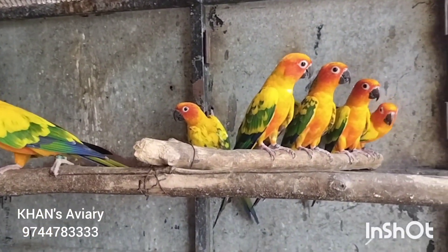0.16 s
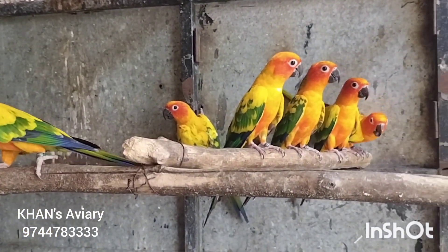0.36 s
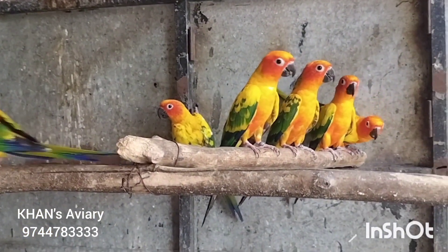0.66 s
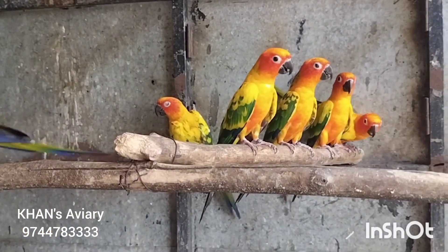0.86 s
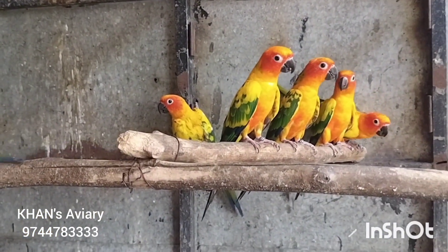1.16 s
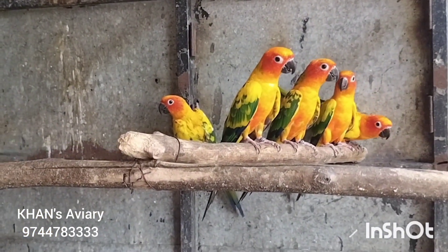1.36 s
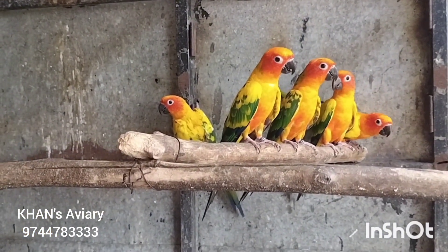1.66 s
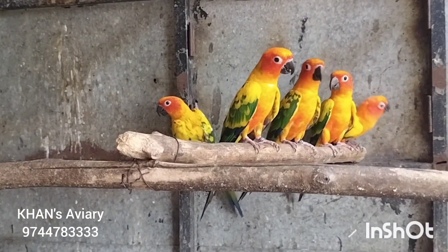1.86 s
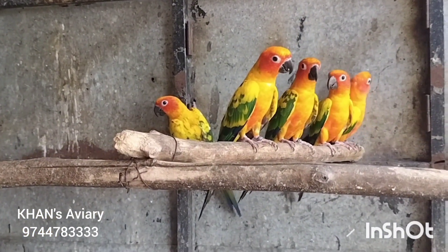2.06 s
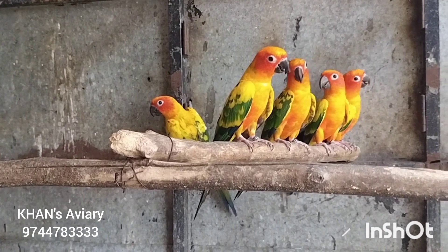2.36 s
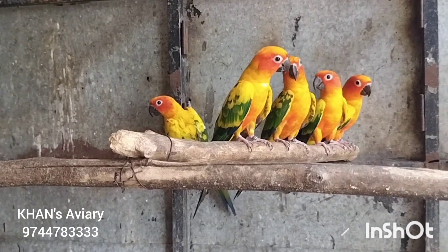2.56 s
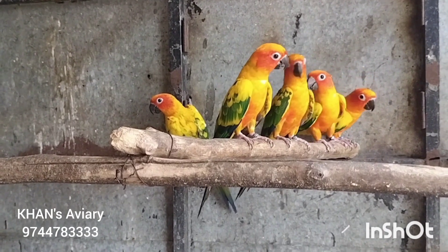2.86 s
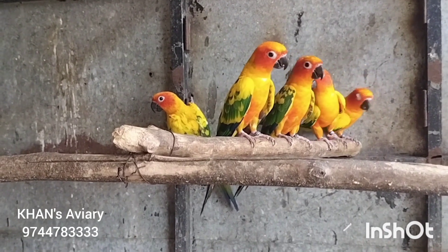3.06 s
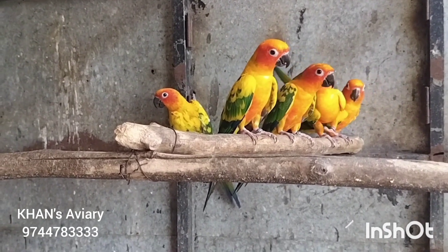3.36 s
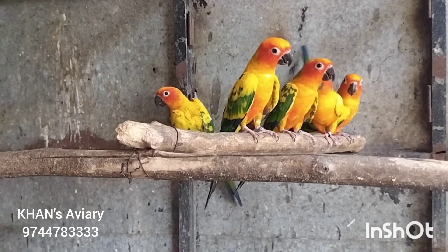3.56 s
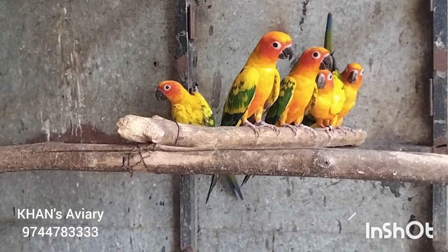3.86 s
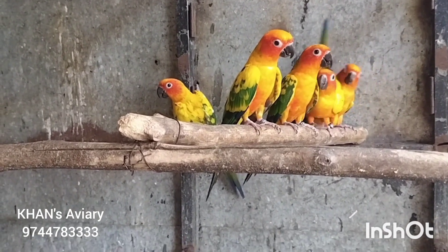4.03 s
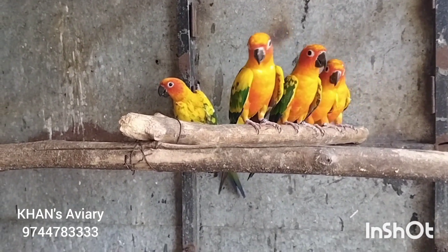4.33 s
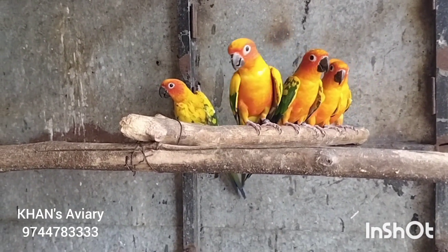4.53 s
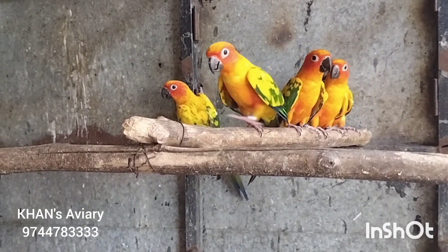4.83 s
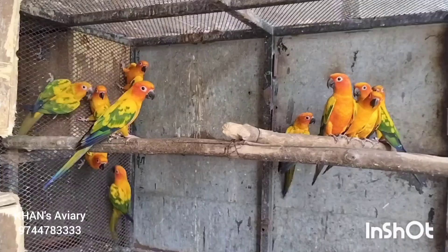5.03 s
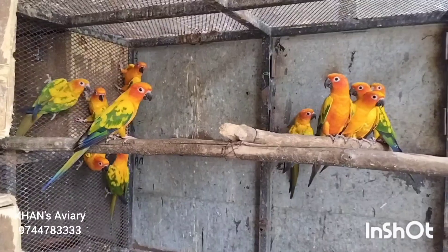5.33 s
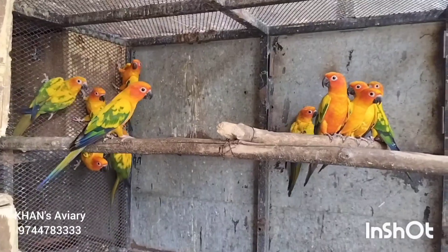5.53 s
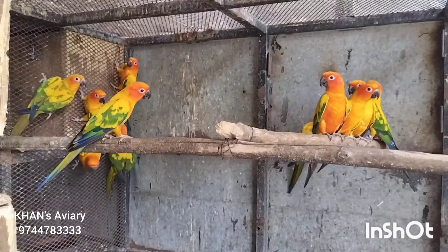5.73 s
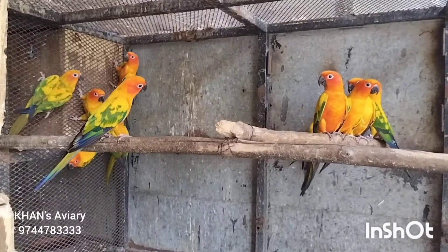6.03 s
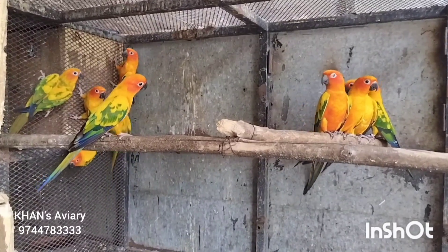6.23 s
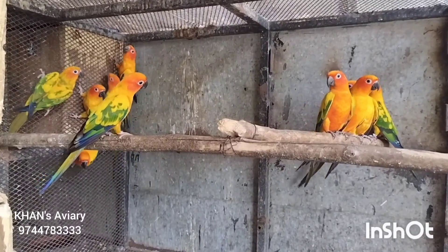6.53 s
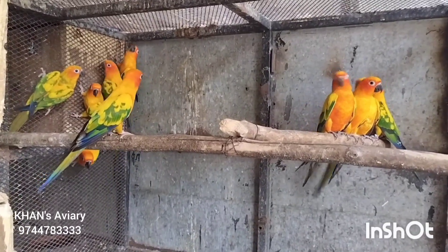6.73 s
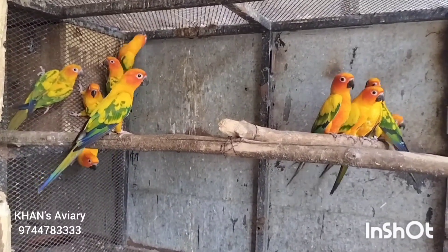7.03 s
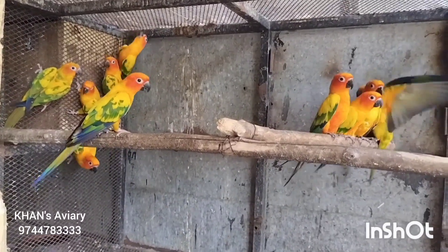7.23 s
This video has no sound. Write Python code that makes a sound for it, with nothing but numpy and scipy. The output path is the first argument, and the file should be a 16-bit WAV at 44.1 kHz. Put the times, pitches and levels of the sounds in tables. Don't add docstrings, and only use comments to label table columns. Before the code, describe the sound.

Small parrots screech and rattle harshly in a hard-walled aviary over faint traffic rumble, with a silent gap before louder chattering squawks.

```python
import sys
import numpy as np
from scipy import signal
from scipy.fft import rfft, irfft, next_fast_len
from scipy.io import wavfile
from scipy.ndimage import uniform_filter1d, minimum_filter1d, map_coordinates

SR = 44100
rng = np.random.default_rng(int(sys.argv[2]) if len(sys.argv) > 2 else 0)


def persist_wave(psi):
    counts = np.round(np.clip(psi, -1, 1) * 32767).astype(np.int16)
    wavfile.write(sys.argv[1], SR, np.atleast_2d(counts).T)


def rack_gain(trim_db):
    fader = np.asarray(trim_db, float)
    return 10 ** (fader / 20)


N = 325899

# first scene's end, second's stuttering start, its steady start, in seconds.
SCENE_CHANGE_S = (4.96, 5.6295, 5.66)

# time in seconds, level in dB.
TRAFFIC_DB = [(0, -40.5), (.23, -46.5), (1.73, -46.5), (1.8, -50), (2.38, -47), (3.94, -47), (4.1, -42),
              (4.46, -45.5), (4.58, -46.5), (4.96, -45), (5.66, -46), (5.88, -38), (6.38, -46),
              (6.45, -39.5), (7.39, -45.5)]
# frequency in Hz, level in dB.
RUMBLE_SPECTRUM = [(12, -52), (20, -6), (81, -1), (97, -3.5), (118, 1.5), (151, 1), (200, -0.5),
                   (258, -7.5), (500, -15), (650, -59), (1100, -120)]
# frequency in Hz, level in dB.
HISS_SPECTRUM = [(180, -12), (300, -27.5), (477, -20), (535, -9), (642, 8), (1540, -3), (1700, 0),
                 (3240, -5.5), (4150, -2), (15600, -21.5)]
HISS_DB, HISS_TRAFFIC_SHARE, SECOND_HISS_DB = -56.5, 0.82, 4
CALMER_DB, CALMER_HZ = -4.5, 107
# start in seconds, end in seconds, frequency in Hz, level in dB.
MOTOR_HUM = [
    (0, 1.75, 91.5, -54),
    (2.27, 4.2, 91.5, -54),
    (0, 4.2, 150.7, -57),
    (6.45, 7.2, 156.1, -50),
]
# frequency in Hz, likeness 0-1.
PORT_LIKENESS = [(60, 0.81), (240, 0.98), (950, 0.24), (3770, 0.25), (15000, 0.3)]
# frequency in Hz, left-right difference in dB.
PORT_BALANCE = [(60, 0), (110, -0.5), (200, -0.5), (380, 0.5), (700, -3), (1290, 3), (2380, 5), (4400, 11),
                (8120, 4.5), (15000, -13)]
# frequency in Hz, 60 dB decay time in seconds.
WALL_T60 = [(500, 0.48), (2000, 0.51), (5000, 0.4), (9000, 0.32), (14000, 0.33)]

# strongest swish in seconds, level in dB, rise in dB/s, fall in dB/s.
WING_SWISHES = [
    (4.01, -46, 275, 82),
    (4.43, -48.5, 903.5, 253),
    (4.62, -57.5, 45, 613),
    (7.113, -39.5, 349, 99.5),
    (7.39, -43.5, 423, 100),
]
# frequency in Hz, level in dB.
FEATHER_SPECTRUM = [(88, -28), (150, -3.5), (542, -26.5), (643, -13.5), (922, -29), (1930, -27),
                    (9000, -59), (11700, -68), (19800, -120)]
# start in seconds, length in seconds, first pitch in Hz, last pitch in Hz, level in dB.
DOVE_COO = (2.53, .135, 640, 760, -55)
# time in seconds, peak in dB.
CLAW_TICKS = [
    (2.145, -47),
    (3.84, -45.5),
    (3.9663, -47.5),
    (4.35, -62),
    (7.169, -49.5),
]

# frequency in Hz, level in dB.
THROAT_DB = [(290, -71), (500, -87.5), (955, -13), (1650, -9), (2020, -2.5), (3540, -3.5), (4150, -3),
             (4860, -5), (6030, -9), (8760, -22), (9830, -21), (12400, -36.5), (13900, -42), (15600, -50)]
BOOST_WIDTH = .75

# time in seconds, peak in dB.
FIRST_SQUAWKS = [
    [(1.8367, -13), (1.8614, -17), (1.8811, -14), (1.9031, -12), (1.9244, -12), (1.9414, -13),
     (1.9575, -17)],
    [(3.1084, -8), (3.1283, -10), (3.1482, -8), (3.1692, -8), (3.1951, -9), (3.2184, -13)],
    [(4.7636, -23), (4.779, -18), (4.7934, -20), (4.8054, -21), (4.8174, -23), (4.8284, -25), (4.8414, -26),
     (4.8564, -24), (4.8753, -18), (4.8963, -19), (4.9195, -21)],
]
# time in seconds, peak in dB.
SECOND_SQUAWKS = [
    [(6.4158, -9), (6.4298, -6), (6.4512, -6), (6.4732, -7), (6.4946, -6), (6.5166, -8), (6.538, -7),
     (6.5584, -9), (6.5859, -5), (6.6024, -10)],
    [(6.754, -6), (6.7695, -7), (6.7915, -6), (6.8144, -8), (6.8394, -8), (6.8613, -11), (6.886, -12),
     (6.909, -12)],
]
# pitch in Hz, harshness 0-1.
RATTLE_VOICE = [
    (780, .25),
    (880, .5),
    (850, .5),
    (900, .55),
    (840, .36),
]
# squawk length in seconds, room in dB, left-right in dB, left lead in ms.
RATTLE_PLACES = [
    (.021, -6, 3.5, .35),
    (.018, -5, 5, .3),
    (.012, -7, 2.5, -.05),
    (.018, -6.5, 3, .15),
    (.017, -7.5, 3, .15),
]
# lowest tone in dB, favoured overtone, its boost in dB, brightness in dB/octave,
# even overtones in dB (a closed windpipe weakens them).
RATTLE_BEAK = [
    (5.5, 5.7, 1.5, -1.5, 4),
    (8.5, 5.7, 3.3, 3, 1),
    (10, 1.52, 14, -4.5, 2.5),
    (-1.5, 5.3, 1.4, -0.5, -1.5),
    (5, 4.7, 5.5, -3, -3),
]
# pitch drift first to last as a share, clear chirp in dB, dulling in dB/octave.
RATTLE_CHANGE = [
    (0.0093, -28.5, 0),
    (-0.015, -20.5, 4.5),
    (0.0099, -28, 10),
    (-0.11, -21.5, 1.5),
    (-.02, -20, 6.5),
]
# first pitch in Hz, last pitch in Hz.
CHIRP_SWEEP_HZ = (870, 1200)
# frequency in Hz, level in dB.
GAPE_DB = [(700, -2.5), (1000, 1.5), (1650, -6.5), (2500, 6), (2800, 2.5), (3100, 1.5), (3550, -6),
           (4400, 6.5), (5600, -3.5), (7000, 4.5)]
GAPE_FROM_S = 4
PITCH_SCATTER = .045
SQUAWK_LEAD_S = .004

# start in seconds, length in seconds, top pitch in Hz, top level in dB,
# share of the length at which effort peaks.
CRY_EVENTS = [(0.023, 0.066, 1525, -17.5, 0.23), (0.211, 0.13, 1346, -20.5, 0.59),
              (0.312, 0.067, 2094, -9, 0.54), (0.698, 0.18, 895, -31, 0.64),
              (0.976, 0.12, 2261, -28.5, 0.75), (1.048, 0.081, 1683, -19.5, 0.96),
              (1.211, 0.024, 1486, -19, 0.13), (1.238, 0.076, 1999, -18, 0.63),
              (1.533, 0.19, 1041, -16, 0.59), (2.23, 0.23, 1186, -37, 0.6), (2.545, 0.12, 2015, -36, 0.28),
              (2.646, 0.089, 1550, -35.5, 0.92), (2.728, 0.095, 2179, -26.5, 0.42),
              (2.966, 0.15, 1993, -19, 0.38), (3.437, 0.054, 1219, -21, 0.53),
              (3.498, 0.05, 1773, -13.5, 0.17), (3.578, 0.14, 1186, -29, 0.21),
              (4.66, 0.16, 1052, -49, 0.52), (5.641, 0.12, 1788, -29, 0.081),
              (5.755, 0.2, 907, -19.5, 0.54), (6.069, 0.18, 1454, -26.5, 0.2),
              (6.293, 0.094, 1353, -32.5, 0.55), (6.878, 0.053, 2284, -16.5, 0.97),
              (6.914, 0.028, 2062, -19, 0.83), (0.367, 0.04, 1989, -14.5, 0.12),
              (1.146, 0.039, 1663, -21, 0.39), (1.31, .018, 1394, -21, 0.33),
              (1.548, 0.19, 1452, -25.5, 0.45), (2.814, 0.1, 1940, -24, 0.57),
              (3.394, 0.04, 1158, -34, 0.81), (3.43, 0.008, 1700, -21.5, 0.25),
              (0.182, 0.038, 896, -27, .6), (0, 0.023, 1330, -17, 0.13), (3.512, 0.045, 1930, -15.5, .4),
              (0.979, 0.098, 819.6, -34, 0.33), (1.713, 0.032, 1420, -20.5, 0.67),
              (5.781, .052, 2890, -31, .9)]
# swell before the top in dB, fade after it in dB.
CRY_EFFORT_DB = [(-14.5, 8.5), (0.5, -3.5), (6, 11), (15.5, 25), (2.5, -9.5), (12, 3.5), (0, -2), (5.5, -2),
                 (18.5, 2.5), (9.5, 9.5), (6, 4), (-1, 2.5), (4, 0), (10.5, 12), (-3.5, 5.5), (3, 7.5),
                 (-5.5, 21), (3.5, -5), (-22.5, 25), (17.5, 15), (-5.5, 2), (8.5, 7), (8, 4.5), (1, 10.5),
                 (1, 6.5), (6, 11.5), (-0.5, 4.5), (0.5, 8.5), (-1.5, 3.5), (2, 2), (2, 6.5), (0, 2),
                 (-31.5, 1.5), (3.5, 9), (-2, 6), (11.5, 4.5), (2.5, 1.5)]
CRY_BENDS = [(0, .02), (.15, 0), (.08, .02), (.25, .04), (.05, -.02), (.26, .03), (0, 0), (.12, .11),
             (.07, .14), (.2, .1), (.01, .04), (.19, 0), (.07, .09), (.03, .05), (.06, .08), (.02, 0),
             (.04, .03), (-.02, .06), (0, -.02), (.22, .07), (-.04, .04), (-.03, .015), (.02, 0), (0, -.02),
             (0, .2), (.02, .16), (0, .2), (.38, .09), (-.02, .05), (.1, 0), (0, 0), (.05, 0), (0, 0),
             (.05, .09), (.05, -.1), (-.04, .02), (.25, 0)]
CRY_HARSHNESS = [.4, .64, .2, .46, .5, .45, .4, .18, .3, .5, .5, .35, .27, .25, .68, .2, .75, .7, .45, .45,
                 .29, .55, .17, .15, .68, .5, .85, .72, .34, .7, .25, .35, .75, .27, .75, .25, .4]
# flutter in beats/s, room in dB, left-right in dB, left lead in ms.
CRY_PLACES = [(73.7, -10, 2.5, -0.134), (75.7, 3, 2, 0.25), (69.1, -14, -1.5, -0.05), (67.7, 11, -2, -0.23),
              (102.2, -4, 2.5, 0.38), (86.1, -1.5, 1, 0.18), (70, -1.5, 1, 0.033),
              (105.3, -7.5, -0.5, 0.303), (78.5, -9.5, 2.5, 0.313), (78.6, 0, -2.5, 0.373),
              (61.7, -9, 2, 0.3), (66.2, 4, -3, 1), (105.5, 6.5, -4.5, 1), (114.6, -1, -3, 0.412),
              (96.3, -2, 2, .3), (64.7, -19, 4, 0.422), (85, 2, -1.5, 0.39), (65.5, 7, -3.5, 0.145),
              (69, 9.5, 2.5, -0.099), (54.1, 5.5, 1, 0.3), (68.6, 9, 2.5, 0.175), (72, -4.5, -1.5, -0.36),
              (62.5, 7, 0.5, 0.19), (70.7, 1, 0, .15), (79.5, -14, -2, 0.167), (90, -4.5, 0.5, 0.16),
              (60.3, -7.5, -1, .3), (90, -1, -2.5, 0.244), (100.8, 3, -1, .35), (91, 3.5, 2, .3),
              (80, -13, 5, 0.91), (79.3, 5, -0.5, .15), (76, -10.5, 4.5, -0.055), (59.4, -15, 5, 0.38),
              (91, -1.5, -0.5, 0.025), (79.9, -12, 2.5, 0.24), (55, -2.5, 4, .3)]
# lowest tone in dB, favoured overtone, its boost in dB, brightness in dB/octave,
# perhaps even overtones in dB.
CRY_BEAKS = [(-8, 3, 3, 1), (-6.5, 5.5, 4.5, 2.5), (-3, 2, 6.5, 6), (6.5, 3, 10.5, 5, 5), (-4, 2, 8, 1.5),
             (-6, 2, 2, -1), (-0.5, 2.9, 11, 4), (-5.5, 5.2, 4.5, -0.5), (-30, 3.5, 3, 9), (7.5, 3, 6, 3.2),
             (3, 0.94, 11.5, 0), (-1.5, 2, 6, 2), (-5.5, 3.9, 7.5, 3.5), (4, 2.5, 20, 8.5),
             (-3, 4.2, 8.5, 2.5), (-7.5, 3.5, 11, 1.5), (1, 3, 5.5, 1.5), (8.5, 2, 4, -3.5),
             (-1, 4.5, 15, -3), (-7.5, 6, 2.5, 5.5, 4), (-23.5, 4, 3, 2.5), (-5, 1.5, 8.5, -0.5),
             (-5.5, 2.4, 8.5, 4), (-14.5, 10, 1.5, -0.5), (-20.5, 3.6, -9, -9), (-2.5, 3, 3.5, 0),
             (-1.5, 2.3, 10.5, 7.5), (-0.5, 3.3, 3.5, 2.5), (-0.5, 2.5, 9, 7.5), (0.5, 3, -4.5, 0),
             (-8, 7.9, 7.5, 4.5), (13.5, 3.3, 9.5, -2.5), (-7, 2.2, 6.5, 12), (-10, 1.6, 9.5, 7.5),
             (17, 2.3, 7.5, -5.5), (-10.5, 1, 11, 4), (4, 5, 0, -3)]
OWN_OVERTONES_DB = {2: [-3, 0, 4, 9, 9], 3: [-8, -14, 3, 1, -2, 5, 0, 9, 2], 8: [-20, -9, 2, 3, -3, 6, 6, 1,
                    8, 3, 11, 5, 17, 9, 0]}
FLUTTER_DEPTH_DB = [5, 3.9, 7, 3.3, 3, 2.3, 6.2, 2.4, 3.7, 3, 1.5, 3.9, 7.5, 3.7, 3, 4, 2.7, 3, 2.8, 3.6,
                    3.2, 3.1, 3.5, 2.4, 2, 3, 1.1, 2, 3, 3.5, 1, 2.5, 3, 3.5, 2.1, 3, 4]
FLUTTER_SLIDES = [.035, .035, .06, .025, .02, .04, .03, .03, .04, .04, .01, .025, .05, .03, .03, .025, .03,
                  .02, .02, .05, .02, .02, .025, .015, .04, .05, .01, .02, .04, .025, .01, .02, .02, .04,
                  .015, .02, .06]


def unit(x):
    return x / np.sqrt(np.mean(x ** 2) + 1e-20)


def along(points, hz):
    f, v = np.transpose(points)
    return np.interp(np.log(hz + 1), np.log(f + 1), v)


def wobble(rate_hz, count, order=3):
    knots = rng.standard_normal(count // 32 + 8)
    return map_coordinates(knots, [np.arange(count) * min(rate_hz / SR, 1 / 32)], order=order)


def filtered(x, response):
    m = next_fast_len(x.shape[-1] + 4096)
    return irfft(rfft(x, m) * response(np.fft.rfftfreq(m, 1 / SR)), m)[..., :x.shape[-1]]


def panned(voice, left_right_db):
    return voice * rack_gain([[left_right_db / 2], [-left_right_db / 2]])


def rush(spectrum, patchy_db):
    z = signal.stft(rng.standard_normal((2, N)), nperseg=512)[2]
    field = rng.standard_normal(z.shape[1:])
    field = uniform_filter1d(uniform_filter1d(field, 6, 0), 10, 1)
    pair = signal.istft(z * rack_gain(patchy_db * unit(field)), nperseg=512)[1][:, :N]

    def mid_side(hz):
        angle = np.arccos(np.clip(along(PORT_LIKENESS, hz), -1, 1)) / 2
        return rack_gain(along(spectrum, hz)) * [np.cos(angle), np.sin(angle)]

    mid, side = filtered(pair, mid_side)
    return unit(np.array([mid + side, mid - side]))


def add_in_room(stage, start_s, voice, room_db, lead_ms):
    hz = np.fft.rfftfreq(256, 1 / SR)
    t = np.arange(190) * 128 / SR
    z = rng.standard_normal((2, 129, 190)) + 1j * rng.standard_normal((2, 129, 190))
    tail = signal.istft(z * rack_gain(-60 * t / along(WALL_T60, hz)[:, None]), SR, nperseg=256)[1]
    tail = tail * (1 - np.exp(-np.arange(tail.shape[1]) / (.008 * SR)))
    heard = rack_gain(room_db) * signal.fftconvolve(voice, tail / np.linalg.norm(tail[0]), axes=1)
    delay_ms = 1 + np.array([[-lead_ms], [lead_ms]]) / 2
    direct = filtered(np.pad(voice, ((0, 0), (0, 99))), lambda hz: np.exp(-2j * np.pi * hz * delay_ms / 1000))
    heard[:, :direct.shape[1]] += direct
    heard = heard / np.sqrt(1 + rack_gain(2 * room_db))
    stage[:, round(start_s * SR):][:, :heard.shape[1]] += heard


def yard():
    t = np.arange(N) / SR
    rumble_db = np.interp(t, *np.transpose(TRAFFIC_DB))
    hiss_db = HISS_DB + HISS_TRAFFIC_SHARE * (rumble_db - rumble_db.mean())
    hiss_db = hiss_db + SECOND_HISS_DB * (t > SCENE_CHANGE_S[0])
    lumps = rack_gain(0.3 * wobble(5.8, N))
    rumble = rack_gain(rumble_db - 5.5) * unit(lumps * rush(RUMBLE_SPECTRUM, patchy_db=1.5))
    calmer = filtered(rumble, lambda hz: rack_gain(CALMER_DB / (1 + (hz / CALMER_HZ) ** 6)))
    rumble = np.where(t < SCENE_CHANGE_S[1], rumble, calmer)
    hiss = rack_gain(hiss_db) * rush(HISS_SPECTRUM, patchy_db=4.0)
    hum = np.zeros(N)
    for start_s, end_s, hz, db in MOTOR_HUM:
        level = rack_gain(db + 1.5 + 1.8 * wobble(7, N))
        tone = np.sin(2 * np.pi * np.cumsum(hz + 3.5 * wobble(7, N)) / SR)
        hum += level * tone * ((t > start_s) & (t < end_s))
    return rumble + hiss + hum


def wings():
    t = np.arange(N) / SR
    beat_hz = 19 + 3 * wobble(36, N)
    beats = unit(rack_gain(1.21 * np.sin(2 * np.pi * np.cumsum(beat_hz) / SR)))
    level = sum(rack_gain(db - np.maximum(rise * (s - t), fall * (t - s))) for s, db, rise, fall in WING_SWISHES)
    return level * beats * rush(FEATHER_SPECTRUM, patchy_db=-0.5)


def coo(stage):
    start_s, length_s, first_hz, last_hz, db = DOVE_COO
    u = np.arange(0, length_s, 1 / SR) / length_s
    pitch_hz = last_hz - (last_hz - first_hz) * (1 - u) ** 2
    note = np.sin(2 * np.pi * np.cumsum(pitch_hz) / SR) * wobble(450, len(u))
    note = note * rack_gain(db + 18 * u) * np.sin(np.pi * u) ** 0.27
    add_in_room(stage, start_s, note * [[1], [1]], -2, .3)


def ticks(stage):
    for start_s, db in CLAW_TICKS:
        click = rng.standard_normal((1, 400)) * rack_gain(db + 20.0 - 60 * np.arange(400) / SR / 0.048)
        click = filtered(click, lambda hz: rack_gain(along(THROAT_DB, hz / 1.2)))
        add_in_room(stage, start_s, click * [[1], [1]], 4, .1)


def beak(lowest_db, favoured, boost_db, bright_db, even_db=0):
    k = np.arange(1, 10)
    bump = np.exp(-((k - favoured) / BOOST_WIDTH) ** 2 / 2)
    tilt_db = bright_db * np.log2(np.maximum(k, 2) / 2)
    return lowest_db * (k == 1) + boost_db * bump + tilt_db + even_db * (k % 2 == 0)


def throat(hz):
    return rack_gain(along(THROAT_DB, hz))


def syrinx(pitch_hz, harsh, beak_db):
    count, k = len(pitch_hz), np.arange(1, 17)[:, None]
    turns = np.cumsum(pitch_hz * (1 + .075 * harsh * wobble(900, count))) / SR
    sizes = throat(k * pitch_hz) * rack_gain(np.take(beak_db, k - 1, mode="clip"))
    shiver = np.array([1 - harsh + 1.8 * harsh * wobble(600, count, order=1) for _ in k])
    phase = 2 * np.pi * rng.random(k.shape)
    tone = np.sum(sizes * shiver * np.sin(k * 2 * np.pi * turns + phase), 0)

    def air_response(hz):
        overtone = hz / pitch_hz.mean()
        return throat(hz) * rack_gain(np.interp(overtone, np.arange(len(beak_db)) + 2.5, beak_db) / 2)

    air = filtered(rng.standard_normal(count), air_response)
    croak = rack_gain(-27) * wobble(250, count) * np.sin(np.pi * turns)
    return unit(unit(tone) + harsh * (.9 * unit(air) + croak))


def rattles(stage):
    rattle_rows = zip(FIRST_SQUAWKS + SECOND_SQUAWKS, RATTLE_VOICE, RATTLE_PLACES, RATTLE_BEAK, RATTLE_CHANGE)
    for squawks, (base_hz, harsh), place, beak_row, (drift, chirp_db, dull_db) in rattle_rows:
        length_s, room_db, left_right_db, lead_ms = place
        first_s, last_s = squawks[0][0], squawks[-1][0]
        voice = np.zeros(round((last_s - first_s + .06) * SR))
        gaps = np.gradient([s for s, db in squawks])
        stretches = np.clip(gaps / np.median(gaps), .85, 1.45)
        for (s, db), stretch in zip(squawks, stretches):
            u = np.arange(round(.03 * SR)) / SR / (length_s * stretch)
            done = (s - first_s) / (last_s - first_s)
            dulled_db = dull_db * (done - .5) * np.log2(np.maximum(np.arange(1, 10) / 5, 1))
            squawk_hz = base_hz * (1 + PITCH_SCATTER * rng.normal() + drift * done)
            pitch_hz = squawk_hz * (.93 + .16 * np.minimum(u, 1))
            squawk = syrinx(pitch_hz, harsh, beak(*beak_row) - dulled_db)
            squawk = squawk * u ** .8 * np.exp(-4.5 * u ** 2)
            chirp_hz = np.interp(u, [.2, 1.2], CHIRP_SWEEP_HZ)
            chirp = np.sin(2 * np.pi * np.cumsum(chirp_hz) / SR) * np.sin(np.pi * np.clip(u / 1.2, 0, 1))
            level = rack_gain(db - 14.0 - 6.5 * (s == first_s))
            voice[round((s - first_s) * SR):][:len(u)] += (unit(squawk) + rack_gain(chirp_db + 8) * chirp) * level
        voice = filtered(voice, lambda hz: rack_gain(along(GAPE_DB, hz) * (first_s > GAPE_FROM_S)))
        add_in_room(stage, first_s - SQUAWK_LEAD_S, panned(voice, left_right_db), room_db, lead_ms)


def cries(stage):
    for n, (start_s, length_s, top_hz, top_db, top) in enumerate(CRY_EVENTS):
        swell_db, fade_db = CRY_EFFORT_DB[n]
        lift, sag = CRY_BENDS[n]
        flutter_hz, room_db, left_right_db, lead_ms = CRY_PLACES[n]
        beak_db = OWN_OVERTONES_DB.get(n, beak(*CRY_BEAKS[n]))
        t = np.arange(0, length_s, 1 / SR)
        top = np.clip(top, .05, .95)
        before = np.clip(1 - t / length_s / top, 0, 1)
        after = np.clip((t / length_s - top) / (1 - top), 0, 1)
        pitch_hz = top_hz * (1 - lift * before ** 2 - sag * after ** 2)
        level_db = top_db - swell_db * before ** 1.56 - fade_db * after ** 0.64
        beat = 2 * np.pi * np.cumsum(flutter_hz * (1 + 0.071 * wobble(40, len(t)))) / SR
        slide = 1 + FLUTTER_SLIDES[n] * signal.sawtooth(beat, .8)
        swell = unit(rack_gain(-FLUTTER_DEPTH_DB[n] * np.cos(beat) + 0.4 * wobble(150, len(t))))
        edge_s = .004 + .004 * rack_gain(room_db)
        edges = np.clip(np.minimum(t, length_s - t) / edge_s, 0, 1)
        voice = syrinx(pitch_hz * slide, CRY_HARSHNESS[n], beak_db) * swell * edges
        voice = panned(voice * rack_gain(level_db + 6.0), left_right_db)
        add_in_room(stage, max(start_s, 0), voice, room_db, lead_ms)


def scene():
    background = yard() + wings()
    stage = np.zeros((2, N + SR))
    coo(stage)
    ticks(stage)
    rattles(stage)
    cries(stage)
    return background + stage[:, :N]


def roll_off(x):
    return signal.sosfilt(signal.butter(12, 15730, fs=SR, output="sos"), x)


def record(dry):
    t = np.arange(N) / SR
    sides = np.array([[.5], [-.5]])
    x = filtered(dry, lambda hz: rack_gain(sides * (along(PORT_BALANCE, hz) - 5.2 * (hz > 1500))))
    limit = np.minimum(1, .99 / (np.abs(x).max(0) + 1e-9))
    x = x * uniform_filter1d(minimum_filter1d(limit, size=301), size=151)

    end_s, start_s, steady_s = SCENE_CHANGE_S
    u = np.clip(t - steady_s, 0, 1)
    thump = -.085 * np.exp(-u / .04) * np.cos(2 * np.pi * 7 * u) * (t >= steady_s) * rack_gain([[0], [-3]])
    step_s = (steady_s - start_s) / 5
    step_size = np.abs((t - start_s) // step_s + 1) ** 1.7 / 14
    step_decay = np.exp(-((t - start_s) % step_s) / 0.0045)
    stutter = -.085 * step_size * step_decay * ((t >= start_s) & (t < steady_s))
    fade_out = np.clip((end_s - t) / .003, 0, 1)
    fade_in = np.clip((t - start_s) / (steady_s - start_s), 0, 1) ** 3
    gate = fade_out + fade_in
    mix = filtered(x * gate + thump + stutter, lambda hz: hz < 15730) * (gate > 0)
    return roll_off(mix)


dry = scene()
out = record(dry)
persist_wave(out)
```